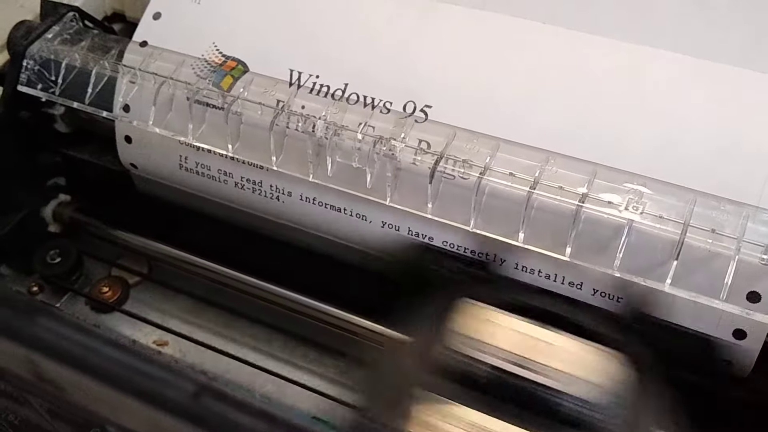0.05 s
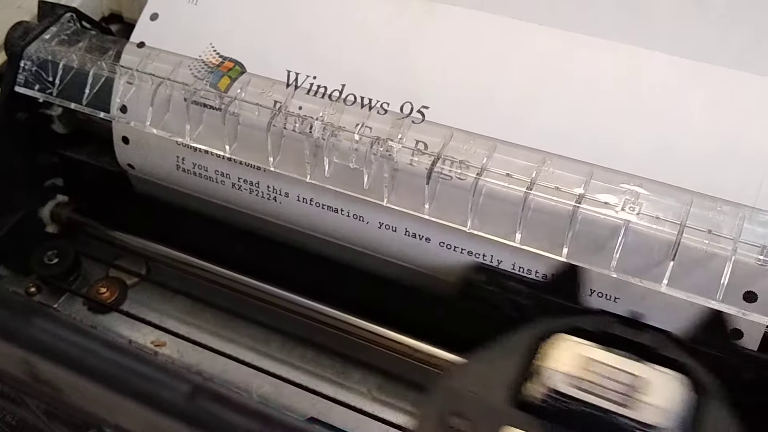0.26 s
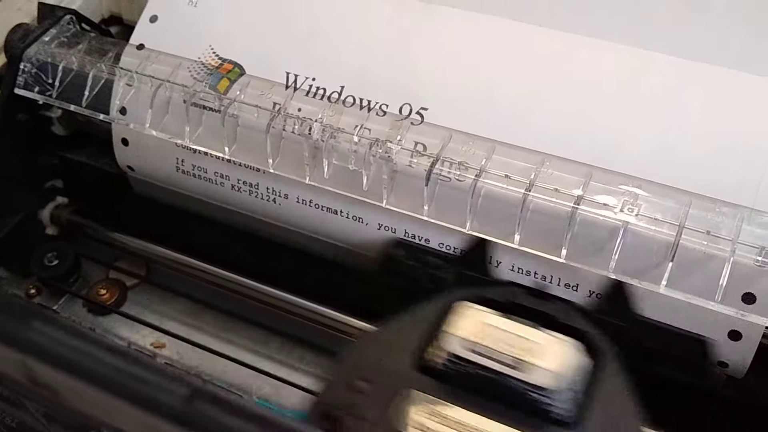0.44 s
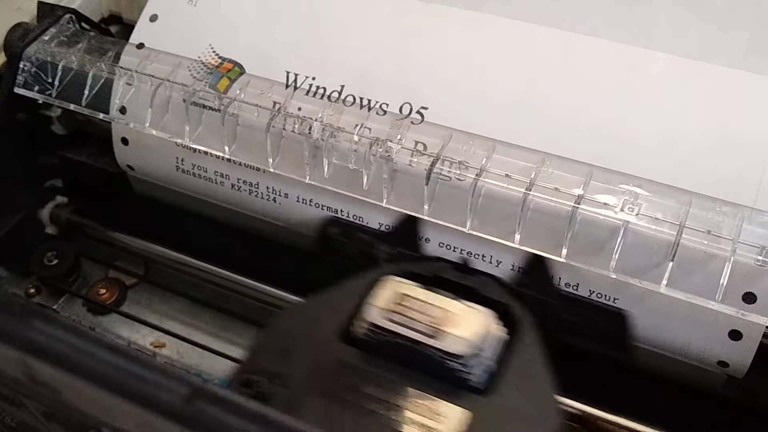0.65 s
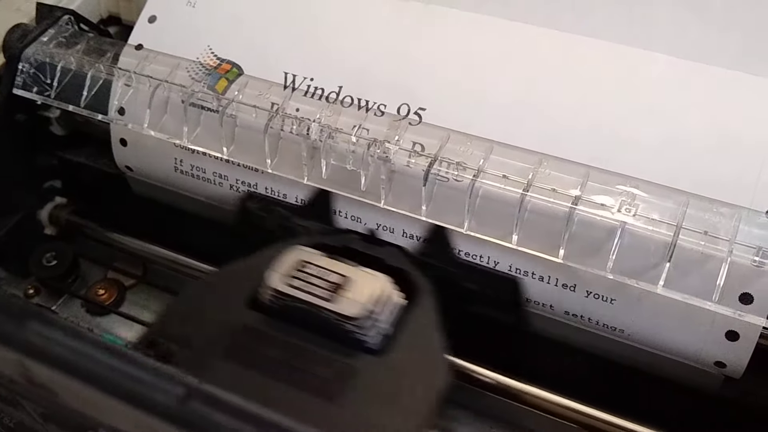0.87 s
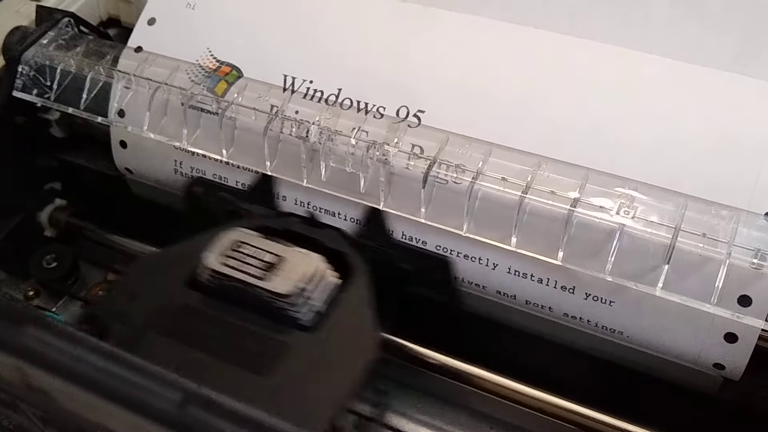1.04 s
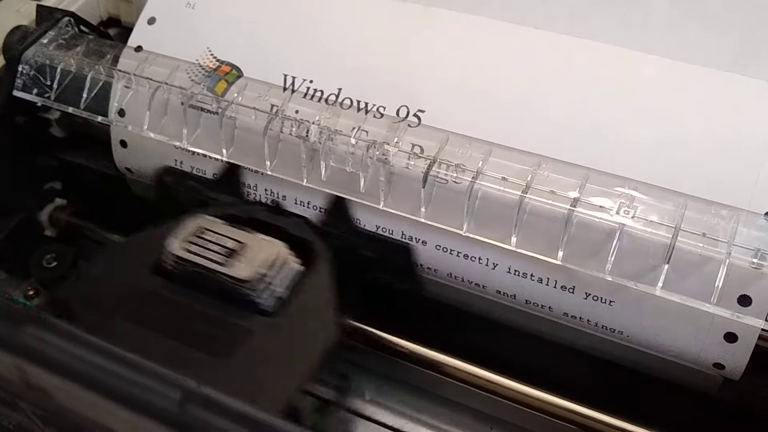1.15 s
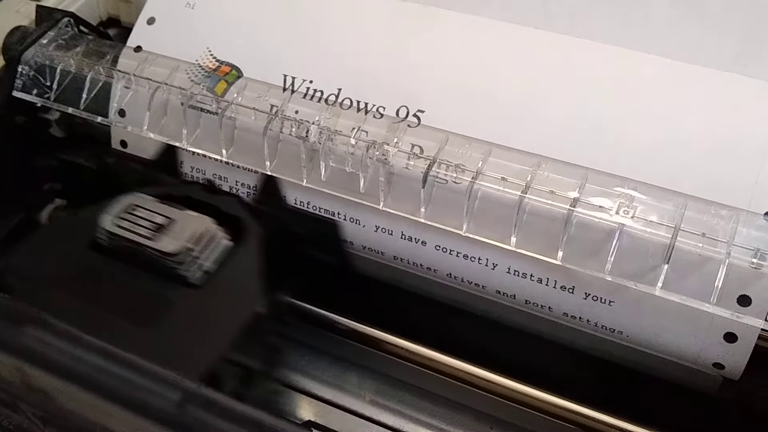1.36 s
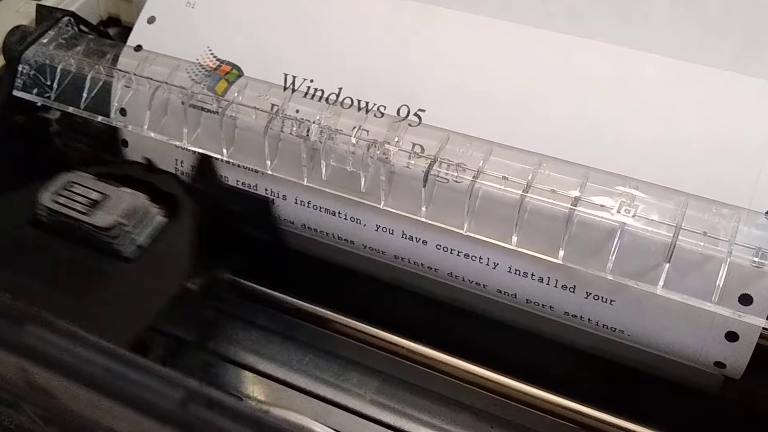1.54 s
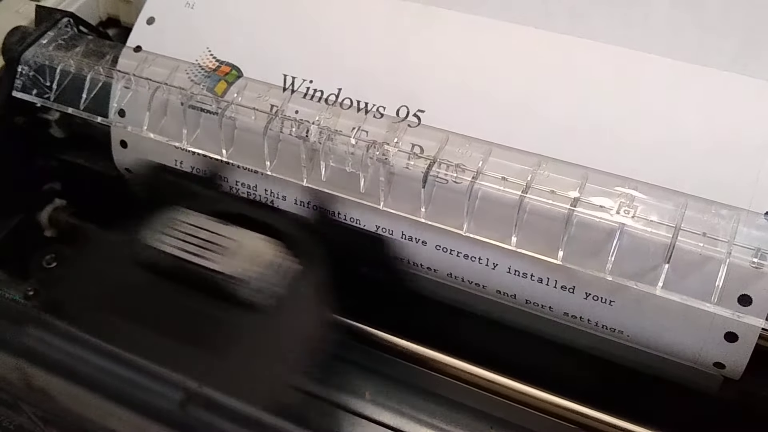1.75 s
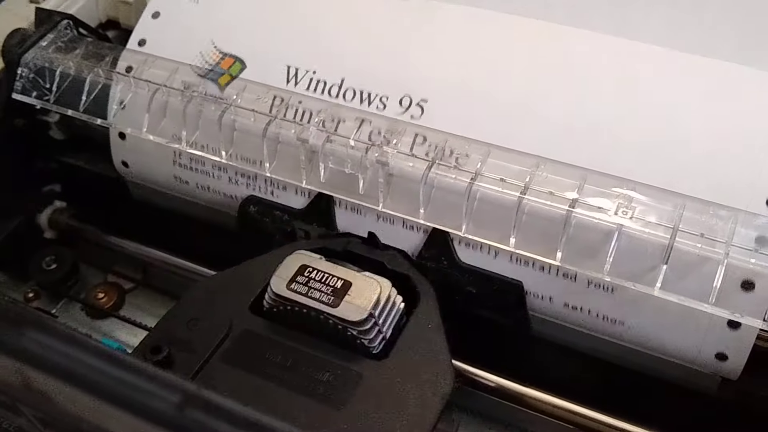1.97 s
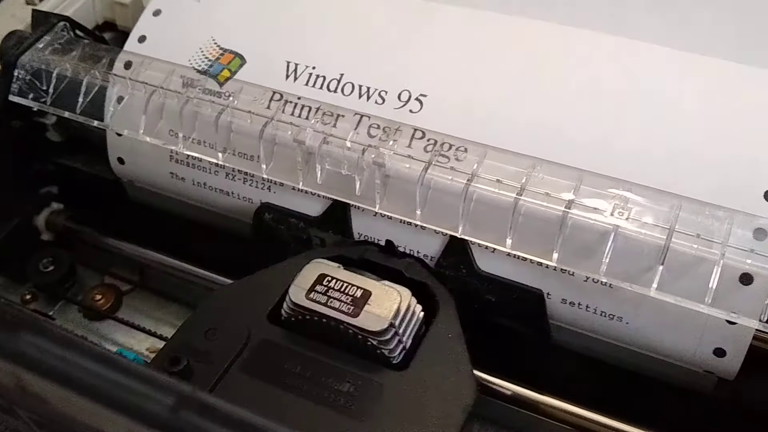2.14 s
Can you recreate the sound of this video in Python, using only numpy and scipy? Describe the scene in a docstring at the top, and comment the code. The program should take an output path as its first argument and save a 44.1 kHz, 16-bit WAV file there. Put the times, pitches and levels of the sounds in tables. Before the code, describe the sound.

Close dot matrix printer buzzing through a line, with carriage whine, rattles and knocks.

```python
"""In a room, very close to a dot matrix printer: the carriage runs out, prints one line on its way back,
runs out again, and the paper feeds. Pins strike in columns, letter by letter, and their impacts excite
the modes of the head. A stepper motor whines at a pitch that follows its speed; the carriage rattles on
its rail and jolts the frame, and the body drones. The right microphone faces the head; the left hears
mostly the reverberation of the case and the room."""
import sys
import numpy as np
from scipy import signal
from scipy.fft import rfft, irfft
from scipy.io import wavfile
from scipy.ndimage import uniform_filter1d

SR = 44100
rng = np.random.default_rng(int(sys.argv[2]) if len(sys.argv) > 2 else 0)


def generate_wav(signal):
    """Clip the signal to [-1, 1] and save it as 16-bit WAV at the path in sys.argv[1]."""
    frames = np.transpose(np.atleast_2d(signal))
    scaled = np.clip(frames, -1, 1) * 32767
    pcm = np.round(scaled).astype(np.int16)
    wavfile.write(sys.argv[1], SR, pcm)


N = 97020
TIME = np.arange(N) / SR
TOP_HZ = 15850


def undb(db):
    """Amplitude ratio of a level in decibels."""
    return 10 ** (np.asarray(db) / 20)


def unit(x):
    """Normalisation to an rms of 1."""
    return x / np.sqrt(np.mean(x ** 2) + 1e-18)


def colour(x, spectrum, balance):
    """Spectral shaping with a left-right level difference; white noise keeps its mean power."""
    hz = np.arange(N + 1) * SR / (2 * N)

    def curve(points):
        point_hz, db = np.array(points, float).T
        return undb(np.interp(np.log(hz + 1), np.log(point_hz), db))

    bass_rolloff = np.minimum(hz / spectrum[0][0], 1) ** 2
    gain = unit(curve(spectrum) * bass_rolloff * (hz < TOP_HZ))
    left = curve(balance)
    pan = 2 * np.array([left, np.ones(N + 1)]) / np.hypot(1, left)
    return irfft(rfft(x, 2 * N) * gain * pan)[:, :N]


def resonate(x, hz, width_hz):
    """Response of a second-order resonator."""
    return signal.lfilter(*signal.iirpeak(hz, hz / width_hz, fs=SR), x)


def drift(rate_hz):
    """Low-pass random fluctuation with an rms of 1."""
    span = int(SR / rate_hz)
    steps = np.repeat(rng.standard_normal(N // span + 1), span)
    return unit(uniform_filter1d(uniform_filter1d(steps, span), span)[:N])


def ring(x, decay_s):
    """Dense damped modes: convolution with exponentially decaying noise of unit energy."""
    t = TIME[:int(7 * decay_s * SR) + 2]
    tail = rng.standard_normal(len(t)) * np.exp(-t / decay_s)
    return signal.fftconvolve(x, tail / np.linalg.norm(tail))[:N]


def place(x, left_db):
    """Direction by level difference: the left channel relative to the right."""
    return np.array([x * undb(left_db), x])


def swell(start, length):
    """A half-sine envelope."""
    return np.sin(np.pi * np.clip((TIME - start) / length, 0, 1))


# spectrum of the body (frequency [Hz], relative level [dB])
BODY_SPECTRUM = [(30, -22), (60, -12.5), (100, -8), (140, -0.5), (180, -9.5), (225, -0.5), (300, -7),
                 (400, -5.5), (480, -17), (660, -5), (900, -6.5), (1300, -9.5), (2500, -25)]
# envelope of its drone (time [s], level [dB])
BODY_ENVELOPE = [(.045, -80), (.065, -62.5), (.3, -52), (.5, -53.5), (1.65, -52.5), (1.9, -55.5),
                 (2.15, -50)]


def body_drone():
    """Forced vibration: the running mechanism drives the body, partly coherent at the two microphones."""
    noise = rng.standard_normal(N) + 0.57 * rng.standard_normal((2, N))
    level_db = np.interp(TIME, *np.array(BODY_ENVELOPE).T)
    return colour(unit(noise) * undb(level_db), BODY_SPECTRUM, balance=[(60, -6.5), (300, 0)])


# thumps and hum of the frame (start [s], duration [s], frequency [Hz], level [dB])
FRAME_SHUDDERS = [(0.057, 0.057, 297.6, -42.5), (0.313, 0.057, 248, -48), (0.365, .13, 341.5, -48.5),
                  (1.412, 0.37, 144.3, -50.5), (1.77, 0.056, 303, -36), (2.011, 0.061, 254.3, -46.5),
                  (2.166, .05, 246, -46.5)]


def frame_shudders():
    """Structural vibration: low thumps as the carriage starts and stops, and a hum late in the line."""
    shudders = 0
    for start, length, hz, db in FRAME_SHUDDERS:
        tone = np.sqrt(2) * np.sin(2 * np.pi * hz * TIME + .5 * drift(50))
        shudders += undb(db) * swell(start, length) * tone
    return place(shudders, left_db=-4)


# partials of the held motor (multiple of the chopper rate, relative level [dB])
CHOPPER_HARMONICS = [(2, -7), (3, 5), (5, 6), (6, -13), (7, -19)]
# spells of holding current (start [s], duration [s], level [dB])
HOLD_SPELLS = [(0.031, 0.033, -58.5), (0.31, 0.18, -56), (1.71, .07, -43.5)]


def holding_whine(chopper_hz=1400):
    """Periodic forcing: chopped current makes the held motor sing on harmonics of the chopper rate."""
    whine = sum(undb(db) * np.sin(2 * np.pi * k * chopper_hz * TIME + 2 * drift(200))
                for k, db in CHOPPER_HARMONICS)
    envelope = sum(undb(db) * swell(start, length) for start, length, db in HOLD_SPELLS)
    return place(whine * envelope, left_db=2.5)


# knocks of belt and carriage (time [s], centre [Hz], filter width [Hz], decay time [s], level [dB])
CARRIAGE_KNOCKS = [(.058, 800, 700, .012, -39), (.31, 1700, 1200, .012, -35), (.357, 1120, 300, .012, -37),
                   (.392, 2600, 400, .025, -28), (1.735, 1000, 500, .02, -43),
                   (1.769, 850, 1000, .025, -37), (1.8, 4100, 2500, .002, -16.5),
                   (1.905, 2600, 2400, .003, -18.5), (2.136, 1400, 1500, .007, -32),
                   (2.137, 9000, 9000, .003, -34), (2.178, 4000, 5000, .004, -39)]


def carriage_knocks():
    """Impact excitation: each jolt releases a band of noise that decays exponentially."""
    knocks = 0
    for at, hz, width, decay, db in CARRIAGE_KNOCKS:
        noise = unit(resonate(resonate(rng.standard_normal(N), hz, width), hz, width))
        knocks += undb(db) * (TIME >= at) * np.exp(-abs(TIME - at) / decay) * noise
    return place(knocks, left_db=-1.5)


# spectrum of the rattling mechanism (frequency [Hz], relative level [dB])
RATTLE_SPECTRUM = [(59, -58), (100, -34), (205, -43), (295, -8.5), (327, -25), (364, -6.5), (431, -23),
                   (533, -10.5), (748, -16), (797, -29.5), (1050, -7), (1380, -13), (2560, -0.5),
                   (11700, -4.5), (15800, -12)]
# its direction (frequency [Hz], left minus right [dB])
RATTLE_DIRECTION = [(60, -1.5), (110, 3), (200, -12), (380, 1), (700, -3), (1290, 0.5), (2380, -26),
                    (4400, -9.5), (8120, -5.5), (15000, -13.5)]


def rattle(excitation, tilt_db_per_octave=0):
    """Source and filter: the mechanism's resonances shape its rattle, tilted above 2500 Hz."""
    tilted = [(hz, db + tilt_db_per_octave * max(np.log2(hz / 2500), 0)) for hz, db in RATTLE_SPECTRUM]
    return colour(excitation, tilted, RATTLE_DIRECTION)


# rattle between moves (start [s], duration [s], level [dB])
SETTLING_SPELLS = [(.3, .09, -47), (2.0, .1, -48)]


def loose_parts():
    """Residual vibration: loose parts rattle on between moves."""
    envelope = sum(undb(db) * swell(start, length) for start, length, db in SETTLING_SPELLS)
    return rattle(rng.standard_normal((2, N)) * envelope)


def stepper(move, tones, rattle_db, tilt_db_per_octave=0, waver_rad=.2):
    """Forced vibration: the whine follows the speed up and down, and the steps modulate the rattle."""
    start, end, ramp, cycle_hz = move
    speed = np.clip(np.minimum(TIME - start, end - TIME) / ramp, 0, 1)
    phase = 2 * np.pi * np.cumsum(speed * cycle_hz) / SR
    whine = sum(undb(db) * np.sqrt(2) * np.sin(k * phase + waver_rad * drift(39.9)) * undb(drift(50.3))
                for k, db in tones)
    grains = rng.standard_normal((2, N)) * undb(1.6 * drift(2500))
    step_pulse = 1 + 0.082 * np.sin(phase)
    shaking = unit(grains * step_pulse) * speed * undb(0.2 * drift(38.8))
    return place(whine * speed, left_db=-3) + rattle(shaking, tilt_db_per_octave) * undb(rattle_db)


# the paper's advance (start [s], end [s], ramp [s], motor cycle rate [Hz])
FEED_MOVE = (2.05, 2.215, .035, 400)
# partials of the feed (multiple of the cycle rate, level [dB])
FEED_PARTIALS = [(1, -49.5), (2, -54)]


def paper_feed():
    """Stepwise drive: a short move advances the paper with a wavering whine and a dull rattle."""
    return stepper(FEED_MOVE, FEED_PARTIALS, rattle_db=-45.5, tilt_db_per_octave=-7, waver_rad=0.38)


# the runs out and the printing pass (start [s], end [s], ramp [s], motor cycle rate [Hz])
OUTWARD_MOVES = [(.05, .332, .04, 507), (1.76, 2.044, .036, 507)]
PRINT_MOVE = (.332, 1.768, .038, 337.7)
# tones of the moving carriage: motor harmonics and other resonances (ratio to the cycle rate, level [dB])
OUTWARD_TONES = [(.71, -54), (1.45, -57), (2, -52.5), (2.15, -56), (5, -46), (7, -45)]
PRINTING_TONES = [(1, -55), (2, -59), (4, -42.5), (6, -58), (12, -53)]
# rattle of each run out (level [dB])
OUTWARD_RATTLE_DB = [-34.5, -33]


def carriage():
    """Pitch follows step rate: two fast, bright runs out and a slower, duller pass back."""
    outward = sum(stepper(move, OUTWARD_TONES, db) for move, db in zip(OUTWARD_MOVES, OUTWARD_RATTLE_DB))
    return outward + stepper(PRINT_MOVE, PRINTING_TONES, rattle_db=-39.5, tilt_db_per_octave=-4)


def case_and_room(x, t60_s=.19, wet_db=(16, -8)):
    """Reverberation: the diffuse sound dominates on the left, the direct sound on the right."""
    return np.array([(direct + wet * ring(direct, t60_s / np.log(1000))) / np.hypot(1, wet)
                     for direct, wet in zip(x, undb(wet_db))])


LINE_START_S, LETTER_HZ, COLUMNS_PER_LETTER = .4145, 56.26, 72
COLUMN_HZ = LETTER_HZ * COLUMNS_PER_LETTER
# letter shapes in printing order: . dot, o two stems, e even, i middle stem, r one side stem, blank space
LINE = ".eooiiiee iroo ooe reeiro reioiro rooe eeoirreeo eoieo ooiieeroioi eoi"
# for each shape, at even steps across the letter (strike density [dB])
LETTER_SHAPES = {".": [-30.5, -12, -5, -5, -12, -24, -28.5], "o": [-7, -1, 0, -3, -1, -1, -7], "e": [-6, -1,
                 0, -1, -1, -2, -7], "i": [-11, -3, 0, 0, -2, -5, -11], "r": [-9, -3, -2, -2, 0, -2, -9]}


def line_of_text():
    """Modulation by the letters: the time and the strike density of every column."""
    across = np.linspace(0, 1, COLUMNS_PER_LETTER)
    letters = {name: undb(np.interp(across, np.linspace(0, 1, len(db)), db)) ** 2
               for name, db in LETTER_SHAPES.items()}
    ink = np.concatenate([letters.get(name, 0 * across) for name in LINE])
    return LINE_START_S + np.arange(len(ink)) / COLUMN_HZ, ink


def pin_strikes(column_times, ink, pins=12, fire_share=.3, scatter_db=1.5, decay_s=0.00086):
    """Superposed impacts: each pin has its own click and fires more often where the ink is dense."""
    strikes = np.zeros((2, N))
    for _ in range(pins):
        dots_due = np.cumsum(ink * fire_share * rng.uniform(0, 2, len(ink))) + rng.random()
        fired = np.diff(np.floor(dots_due), prepend=0)
        strength = fired * undb(scatter_db * rng.standard_normal(len(ink)))
        flight_s = rng.random(len(ink)) / COLUMN_HZ
        impulses = np.bincount(((column_times + flight_s) * SR).astype(int), strength, N)[:N]
        strikes += [ring(impulses, decay_s), ring(impulses, decay_s)]
    return unit(strikes)


# partials around the column rate (multiple of the letter rate, relative level [dB])
COLUMN_PARTIALS = [(36, -16), (72, 0), (108, -14), (144, -9), (180, -8), (214, -18)]


def column_tone(column_times, ink, sway_rad=0.67, wander_rad=0.31):
    """Repetition pitch: evenly spaced columns sound a tone, phase-modulated once a letter."""
    letter_phase = 2 * np.pi * LETTER_HZ * (TIME - LINE_START_S)
    sway = sway_rad * np.cos(letter_phase)
    tone = sum(undb(db) * np.sin(k * letter_phase + sway + wander_rad * drift(130))
               for k, db in COLUMN_PARTIALS)
    return tone * unit(np.interp(TIME, column_times, ink, 0, 0) ** 0.69)


def head_ring(strikes, centre_hz, width_hz=1280):
    """Time-varying resonance: the strikes excite a high band that glides as the head travels."""
    carrier = np.exp(2j * np.pi * np.cumsum(centre_hz) / SR)
    lowpass = signal.butter(2, width_hz / 2, fs=SR, output="sos")
    return unit((signal.sosfilt(lowpass, strikes / carrier) * carrier).real)


# spectrum of the pin strikes (frequency [Hz], relative level [dB])
PIN_SPECTRUM = [(290, -64), (500, -52), (829, -55), (986, -19), (1120, -18.5), (1320, -16), (1440, -34),
                (1840, -18), (2150, -9.5), (2830, -9.5), (3040, -8), (3420, -7), (4060, -2.5), (4500, -5),
                (4900, -10), (6540, -9.5), (8610, -7), (10400, -4.5), (15800, -16.5)]
# their direction (frequency [Hz], left minus right [dB])
PIN_DIRECTION = [(60, -3.0), (110, -3.5), (200, -2.0), (380, -6), (700, 2), (1290, 4), (2380, -15.0),
                 (4400, -8), (8120, -7.5), (15000, -16.5)]
# modes of the head frame (frequency [Hz], bandwidth [Hz], level [dB])
HEAD_FRAME_MODES = [(1060, 130, -47.5), (1670, 110, -44), (2160, 135, -39), (3088, 49, -34.5),
                    (4063, 105, -33.5), (4934, 250, -36), (5870, 96, -40.5), (11700, 780, -30.5)]
# along the line (time [s], ring frequency [Hz], ring level [dB], column tone gain [dB], strike gain [dB])
HEAD_TRAVEL = [(.42, 9800, -22, -22.5, -0.5), (.65, 9830, -20.5, -59, -1), (.9, 9940, -21, -27.5, 0),
               (1.15, 10130, -24.5, -26.5, 0.5), (1.3, 10400, -27, -30.5, 0.5),
               (1.48, 10350, -35, -22.5, 0), (1.66, 10100, -30, -41, 0)]


def print_head():
    """Modal excitation by impact: the pins clatter, sound the column rate and ring the head."""
    times, *tracks = np.array(HEAD_TRAVEL).T
    ring_hz, ring_db, tone_db, strike_db = (np.interp(TIME, times, track) for track in tracks)
    column_times, ink = line_of_text()
    strikes = pin_strikes(column_times, ink)
    clatter = colour(strikes, PIN_SPECTRUM, PIN_DIRECTION) * undb(strike_db - 25)
    tone = column_tone(column_times, ink) * undb(tone_db + 2.5)
    modes = sum(undb(db) * unit(resonate(strikes[1], hz, width)) for hz, width, db in HEAD_FRAME_MODES)
    ringing = head_ring(strikes[1], ring_hz) * undb(ring_db)
    reverberant = case_and_room(clatter + place(tone, left_db=-14.5))
    return reverberant + place(modes, left_db=-12) + place(ringing, left_db=-37)


def scene():
    """Superposition: the pressures from head, motors, frame and body add."""
    mechanism = print_head() + carriage() + paper_feed() + loose_parts()
    return mechanism + frame_shudders() + holding_whine() + carriage_knocks() + body_drone()


def record(dry, left_lag_s=0.00021, ceiling=.98):
    """Path difference: sound reaches the left microphone later; peaks are clipped and the top is cut."""
    left = np.pad(dry[0], (round(left_lag_s * SR), 0))[:N]
    lowpass = signal.ellip(10, .2, 80, TOP_HZ, fs=SR, output="sos")
    return signal.sosfilt(lowpass, np.clip([left, dry[1]], -ceiling, ceiling))


dry = scene()
out = record(dry)
generate_wav(out)
```